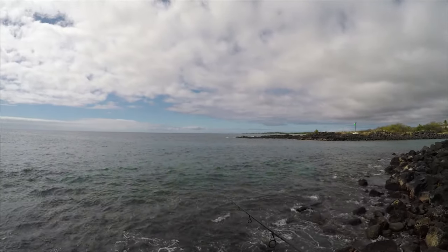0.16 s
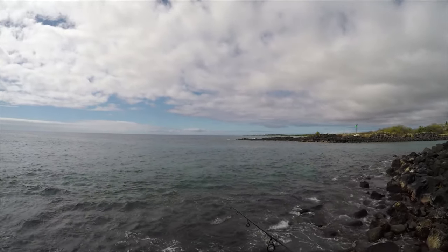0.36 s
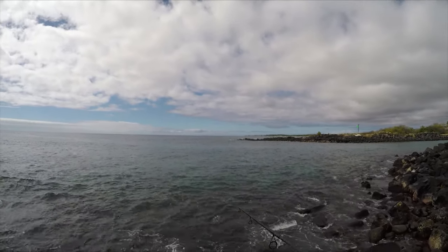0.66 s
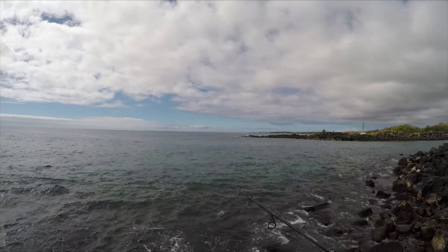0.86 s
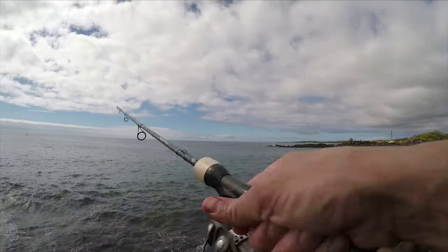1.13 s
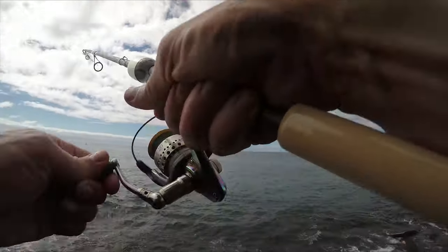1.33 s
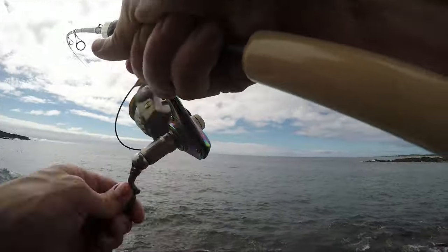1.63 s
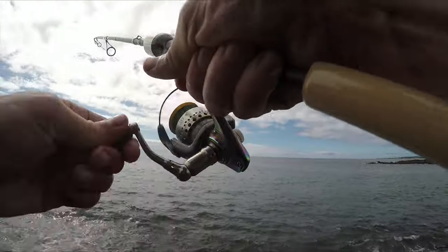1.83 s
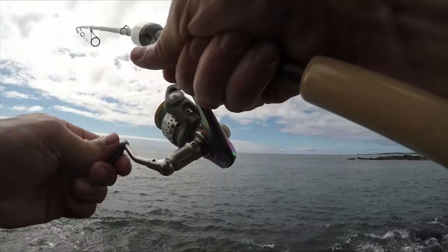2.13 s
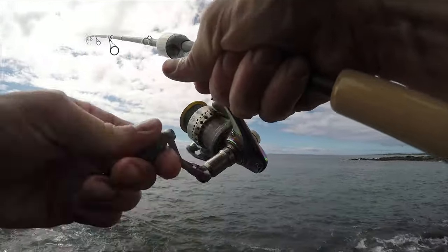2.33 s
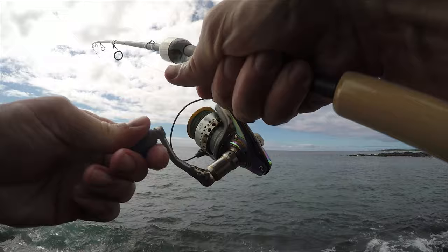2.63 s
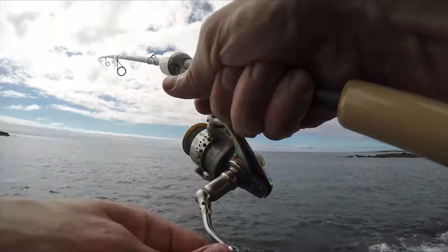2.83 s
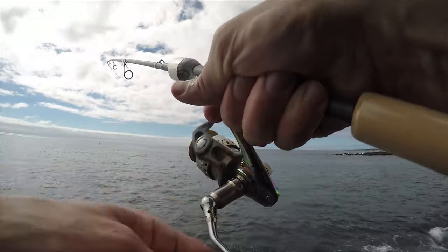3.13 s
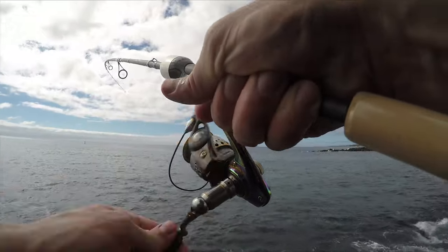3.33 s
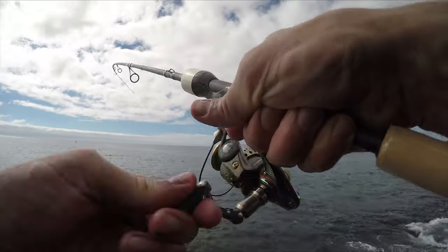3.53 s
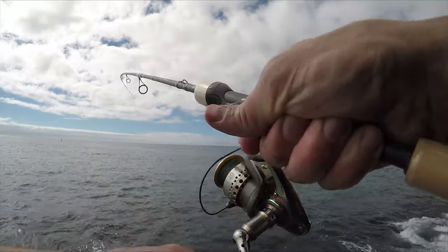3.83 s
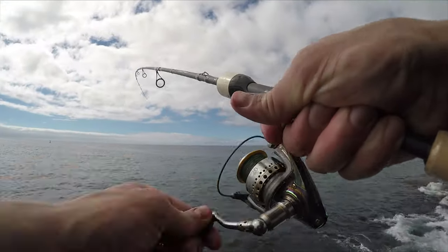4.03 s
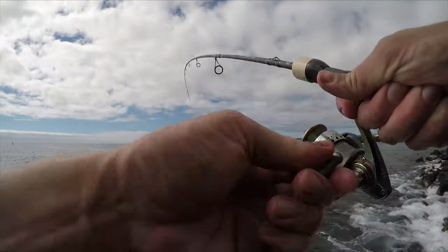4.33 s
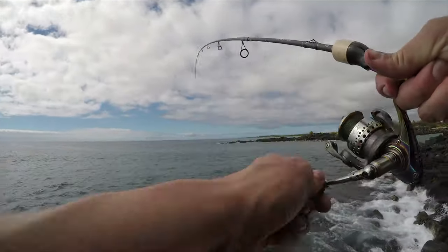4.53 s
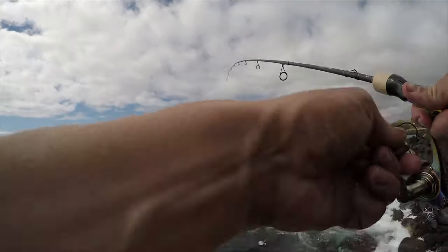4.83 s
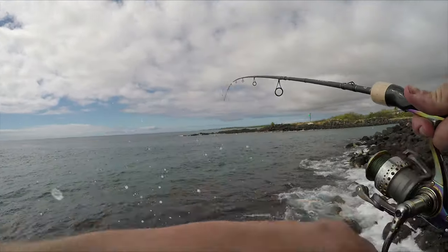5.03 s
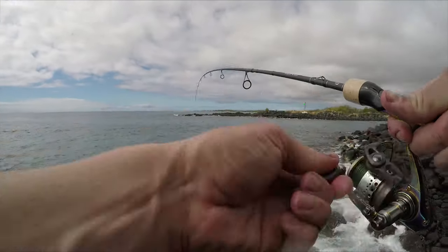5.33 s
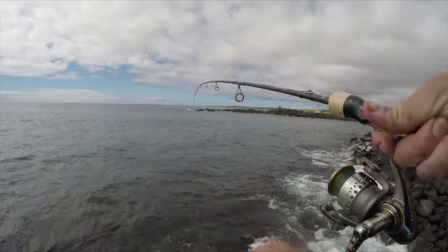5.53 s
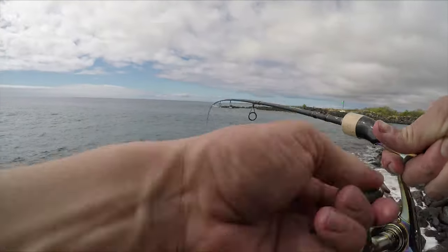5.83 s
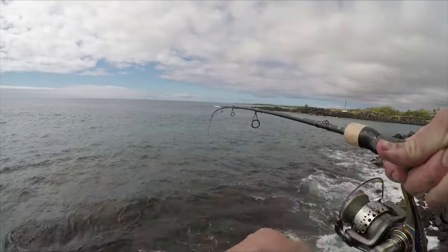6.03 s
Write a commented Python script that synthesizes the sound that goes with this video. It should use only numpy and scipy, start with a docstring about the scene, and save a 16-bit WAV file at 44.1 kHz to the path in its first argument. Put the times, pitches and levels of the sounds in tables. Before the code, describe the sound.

Muffled sea washes against a rocky shore while wind thumps on a microphone inside a closed plastic case. A fishing reel starts winding with a soft raspy whirr and a few short, high squeaks. A wave builds and breaks on the boulders with a hollow roar, then drains away in hissing foam. Near the end, drops and tackle tick sharply and a hand scrapes faintly on the rod.

```python
"""Angling on a rocky shore

A wave breaks on boulders and drains away: bubbles resonate, foam bursts and spray fizzes. An angler winds a
spinning reel, whose gears whirr and whose dry bearing squeaks by stick-slip friction. A hand scrapes on the
rod; drops and tackle tick. All is heard from inside a closed plastic case, which muffles the surf, rings at its
own resonances and is buffeted by the wind, the hand and the wave."""
import sys
import numpy as np
from scipy import signal
from scipy.fft import rfft, irfft
from scipy.io import wavfile
from scipy.ndimage import uniform_filter1d

SR = 44100
rng = np.random.default_rng(int(sys.argv[2]) if len(sys.argv) > 2 else 0)


def dump(signal):
    """Clip the signal to [-1, 1] and save it as 16-bit WAV at the path in sys.argv[1]."""
    limited = np.clip(np.atleast_2d(signal).T, -1, 1)
    pcm = np.round(limited * 32767).astype(np.int16)
    wavfile.write(sys.argv[1], SR, pcm)


N = 271643
TIME = np.arange(N) / SR


# the wave builds, breaks and drains: t/s, level/dB
SURGE = [(0, -33.5), (1.0, -28.5), (1.4, -26), (2.55, -24.5), (3.22, -19.5), (3.31, -16.3), (3.8, -15),
         (4.15, -16), (4.65, -18.5), (4.9, -17.5), (5.25, -21.5), (5.7, -21.6), (6.16, -26)]

def surf():
    """Air entrainment: the surge drives the roar, and feeds foam and spray that outlast it."""
    surge_db, = curves(SURGE)
    foaming = lingering(surge_db, linger_s=0.91, share=0.65, growth=1.46, crest_db=-29.5, rest_db=-44)
    spraying = lingering(surge_db, linger_s=.5, share=0.63, growth=1.63, crest_db=-40.5, rest_db=-58)
    return undb(surge_db) * roar() + np.hypot(foaming, splashes()) * foam() + spraying * spray()


def lingering(surge_db, linger_s, share, growth, crest_db, rest_db):
    """Exponential relaxation: gain of a hiss, with a share that lags the surge, over a steady floor."""
    power = undb(surge_db + 16) ** 2  # relative to a crest of -16 dB
    keep = np.exp(-1 / (linger_s * SR))
    stored = signal.lfilter([1 - keep], [1, -keep], power)
    amount = (1 - share) * power + share * stored
    return np.hypot(undb(crest_db) * amount ** (growth / 2), undb(rest_db))


# share of the power in tumbling rather than washing water: t/s, share (0-1)
TUMBLING = [(0, 0.47), (2.6, 0), (3.3, 0.86), (4.3, 1), (4.7, 0.22), (5.6, 0.14), (6.16, 0.47)]
# spectra of tumbling and of washing water inside the case: f/Hz, relative level/dB
CRASH_SPECTRUM = [(40, -24.5), (110, 1.5), (200, -5), (330, 0), (520, -0.5), (700, 1.5), (850, -4),
                  (1050, -12), (1300, -25), (1750, -27.5), (3500, -32.5), (4800, -27.5), (7000, -41),
                  (9000, -63)]
WASH_SPECTRUM = [(40, -16.5), (110, 2), (200, -4.5), (330, -2), (520, -1.5), (690, 0), (800, -4),
                 (950, -12), (1300, -23), (1700, -26.5), (2400, -37.5), (4000, -75)]

def roar():
    """Turbulence and large bubbles: a broad crash trades power with a hollow wash among the stones."""
    share, = curves(TUMBLING)
    gurgle = bubbles(low_hz=176.7, high_hz=1404, cycles=15.3, spread_db=6.5, count=3000)
    crash = colour(noise() + undb(-11) * pops(rate=500, spread_db=2), CRASH_SPECTRUM)
    wash = colour(noise() + undb(-13) * gurgle, WASH_SPECTRUM)
    return (np.sqrt(share) * crash + np.sqrt(1 - share) * wash) * undb(.5 * walk(18))


def bubbles(low_hz, high_hz, cycles, spread_db, count):
    """Bubble resonance: each is a damped oscillator whose pitch rises as it nears the surface."""
    out = np.zeros(N)
    for when, pitch, size in rng.random((count, 3)):
        hz = low_hz + (high_hz - low_hz) * pitch
        life = cycles / hz
        t = np.arange(int(life * SR) + 2) / SR
        chirp = ring(hz * (1 + 0.18 * t / life), life, t)
        add(out, when * N / SR, undb(spread_db * size) * np.sqrt(hz) * chirp)
    return unit(out)


# spectrum of foam inside the case: f/Hz, relative level/dB
FOAM_SPECTRUM = [(900, -24.5), (1750, -16), (2100, -8), (2500, 0.5), (2800, 1.5), (3150, -2.5), (3550, -12),
                 (4000, -9.5), (4800, -7.5), (5600, -10), (6300, -11), (7200, -17), (8000, -24),
                 (10000, -42)]

def foam():
    """Forced vibration: the crackle and hiss of bursting foam excite the walls of the case."""
    crackle = pops(rate=2500, spread_db=4.5)
    return colour(noise() + undb(-5) * crackle, FOAM_SPECTRUM) * undb(0.7 * walk(24.9))


# water slaps a boulder and bursts into foam: t/s, level/dB
SPLASHES = [(3.33, -32.5), (3.91, -33), (4.3, -32.5), (4.56, -30), (4.84, -31.5), (5.06, -36)]

def splashes():
    """Incoherent sources add in power: the gain of the foam that the splashes throw up."""
    gains = [undb(db) * swell(s, rise_s=0.065, hold_s=0, fall_s=0.18) for s, db in SPLASHES]
    return np.sqrt(sum(gain ** 2 for gain in gains))


# spectrum of spray inside the case: f/Hz, relative level/dB
SPRAY_SPECTRUM = [(5000, -2), (7200, -4), (8000, 5.5), (9000, 1), (10500, 1.5), (11700, -1), (13000, 3.5),
                  (14200, 1.5), (15500, -3.5)]

def spray():
    """Shot noise: the finest droplets merge into a high fizz; now and then a larger one lands."""
    fizz = pops(rate=2600, spread_db=5.5)
    drops = pops(rate=45, spread_db=5)
    patter = noise() + undb(-10) * fizz + undb(-15) * drops
    return colour(patter, SPRAY_SPECTRUM) * undb(.5 * walk(25.3))


# whirr of the reel as it is wound: t/s, level/dB
WINDING = [(0, -75), (1.0, -64), (1.25, -42), (1.4, -35), (1.53, -38.5), (1.7, -35.5), (2.05, -38.5),
           (2.15, -38.5), (2.23, -40), (2.38, -42.5), (4.5, -37.5), (6.16, -51)]
# spectrum of the whirr: f/Hz, relative level/dB
REEL_SPECTRUM = [(300, 4), (800, -3.5), (1300, 2), (1600, -18), (1850, -23), (2100, -1), (2400, 3),
                 (2900, -13.5), (3400, -21), (4200, -10.5), (6700, -21), (7900, -12), (11000, -37),
                 (13500, -28)]

def reel():
    """Amplitude modulation: the rasp of gears and running line throbs as the rotor goes round."""
    whirr_db, = curves(WINDING)
    rotor_hz = 11 * (1 + 0.1 * walk(2.3))
    throb_db = 0.85 * np.sin(2 * np.pi * np.cumsum(rotor_hz) / SR)
    rasp = noise() + undb(-2.5) * pops(rate=900, spread_db=4)
    return colour(rasp, REEL_SPECTRUM) * undb(whirr_db + throb_db + 1.5 * walk(90))


# squeaks of the reel: t/s, duration/s, f/Hz, level/dB
SQUEAKS = [(1.476, 0.018, 4150, -39), (1.621, .05, 2480, -29.5), (1.678, 0.059, 2485, -25.5),
           (2.224, 0.017, 2420, -33.5)]

def squeak(slip_s=.016, glide=0.023, warble_hz=25.34, warble_depth=0.062, warble_top_s=1.671):
    """Stick-slip friction: a dry bearing gives runs of short gliding tones with a weak octave."""
    out, roughness = np.zeros(N), walk(400)
    bend = warble_depth * np.cos(2 * np.pi * warble_hz * (TIME - warble_top_s)) + 0.025 * walk(500)
    for start, length, hz, db in SQUEAKS:
        slips = max(round(length / slip_s), 1)
        for s in start + length * np.arange(slips) / slips:
            n, i = int(length / slips * SR), int(s * SR)
            first_hz, last_hz = hz * (1 + glide * rng.standard_normal(2))
            pitch_hz = np.linspace(first_hz, last_hz, n) * (1 + bend[i:i + n])
            phase = 2 * np.pi * np.cumsum(pitch_hz) / SR
            envelope = signal.windows.tukey(n, .4) * undb(db + 1.6 * roughness[i:i + n])
            add(out, s, envelope * (np.sin(phase) + undb(-18) * np.sin(2 * phase)))
    return out


# drops and tackle strike the case and rod: t/s, peak level/dB, f/Hz
TICKS = [(.385, -32, 4600), (1.019, -29, 4700), (1.2483, -22, 4700), (1.311, -30, 10500),
         (2.6098, -28, 5200), (4.1475, -30, 5000), (5.1027, -20.5, 5340), (5.238, -26, 11500),
         (5.62, -20, 4500), (5.6695, -17, 5000), (5.720, -23, 6000), (5.736, -19, 4180),
         (5.7705, -21.5, 5730), (5.803, -26, 9500)]
# normal modes of the case: f/Hz, T60/s, relative level/dB
CASE_MODES = [(2600, .010, -12), (4700, 0.0064, 2), (6200, .006, -26), (13000, .004, -16)]

def ticks():
    """Impact excitation: each tick cracks around its own pitch and sets the modes of the case ringing."""
    out, t = np.zeros(N), np.arange(SR // 40) / SR
    case = sum(undb(db) * ring(hz, t60, t) for hz, t60, db in CASE_MODES)
    attack, decay = 1 - np.exp(-t / 0.00012), np.exp(-t / 0.0011)
    for s, db, hz in TICKS + stray_drops(count=7):
        band = signal.butter(2, [.6 * hz, 1.4 * hz], "bandpass", fs=SR, output="sos")
        crack = signal.sosfilt(band, rng.standard_normal(len(t)) * decay)
        tick = (crack + undb(-4) * ring(hz, 0.005, t) + undb(-6) * case) * attack
        add(out, s, undb(db) * tick / np.abs(tick).max())
    return out


def stray_drops(count, from_s=3.6, until_s=6.0, db=-21, scatter_db=1, hz=4730, scatter_octaves=0.23):
    """Random arrivals: drops land after the wave breaks, as rows of t/s, peak level/dB, f/Hz."""
    return [(from_s + when * (until_s - from_s),
             db + scatter_db * (2 * size - 1),
             hz * 2 ** (scatter_octaves * (2 * pitch - 1)))
            for when, size, pitch in rng.random((count, 3))]


# the hand works on the rod handle: t/s, hold/s, level/dB
GRIPS = [(1.0, .48, -44.5), (4.5, 1.45, -44)]
# spectrum of the scrape: f/Hz, relative level/dB
GRIP_SPECTRUM = [(1700, -23), (2500, 7.5), (3400, -0.5), (4600, -0.5), (6300, -6), (7500, -28),
                 (12000, -34)]

def grip():
    """Sliding friction: skin scrapes unevenly over the rod handle in tiny catches."""
    scrape = colour(noise() + undb(-3) * pops(rate=530, spread_db=5), GRIP_SPECTRUM)
    effort = sum(undb(db) * swell(s, rise_s=.02, hold_s=hold, fall_s=.07) for s, hold, db in GRIPS)
    return scrape * effort * undb(2 * walk(30.6))


# the breeze on the case, which drops once the wave has broken: t/s, level/dB
BREEZE = [(0, -18), (0.7, -16), (1.7, -17.5), (2.22, -21.5), (2.5, -18), (3.2, -18), (4.2, -18),
          (4.62, -14.5), (4.76, -25), (5.05, -27), (6.16, -25)]
# buffets on the case: gusts of wind, bumps of the hand (1.345, 2.466 s) and thuds of the plunging wave (4.296,
# 4.867 s): t/s of the peak, 1/e half-width/s, rumble level/dB, flutter level/dB
BUFFETS = [(0.245, 0.048, -13.5, -49), (0.474, 0.043, -11.5, -34), (0.668, .04, -21, -45),
           (0.962, 0.028, -17, -34), (1.345, 0.033, -15.5, -23.5), (2.068, .025, -10.5, -32),
           (2.466, .05, -13.5, -24.5), (2.808, 0.015, -9.5, -37), (3.015, 0.037, -12.5, -32),
           (3.503, 0.014, -7.5, -36), (3.77, 0.038, -18, -38), (3.878, 0.036, -17, -24),
           (4.082, .035, -11, -26), (4.296, 0.28, -22, -21.5), (4.44, .025, -21, -27), (4.867, .12, -20, -23),
           (6.15, 0.019, -14, -36)]
# spectra of the large and of the small eddies: f/Hz, relative level/dB
RUMBLE_SPECTRUM = [(8, -24), (20, -3.5), (35, 0), (55, -4), (85, -8.5), (120, -17.5), (180, -22),
                   (300, -36), (800, -74)]
FLUTTER_SPECTRUM = [(40, 1), (130, -2), (330, -2.5), (550, -7), (1000, -23), (3000, -56)]

def wind():
    """Turbulent pressure: large eddies rumble on the case; gusts, bumps of the hand and thuds of the wave
    buffet it, with a flutter on top."""
    breeze_db, = curves(BREEZE)
    power, flutter = undb(breeze_db + 1.6 * walk(18)) ** 2, 0
    for s, half_width, rumble_db, flutter_db in BUFFETS:
        gust = np.exp(-((TIME - s) / half_width) ** 2)
        power = power + (undb(rumble_db) * gust) ** 2
        flutter = flutter + undb(flutter_db) * gust
    eddies = colour(noise(), RUMBLE_SPECTRUM)
    running_rms = np.sqrt(uniform_filter1d(eddies ** 2, size=4000))
    return eddies / running_rms * np.sqrt(power) + flutter * colour(noise(), FLUTTER_SPECTRUM)


# spectrum of distant waves inside the case: f/Hz, relative level/dB
OPEN_SEA_SPECTRUM = [(100, -10.5), (500, 3.5), (900, -6), (1150, -9), (1450, -17.5), (1750, -26),
                     (2500, -13), (3100, -16.5), (3600, -26), (7000, -54)]

def open_sea():
    """Incoherent superposition: small waves further along the shore merge into an even rush."""
    return colour(noise(), OPEN_SEA_SPECTRUM) * undb(-34.5 + 0.42 * walk(3.4))


def undb(db):
    """Level in decibels to amplitude ratio."""
    return 10 ** (np.asarray(db) / 20)


def unit(x):
    """Normalisation to rms 1."""
    return x / np.sqrt(np.mean(x ** 2))


def curves(table):
    """Linear interpolation of a timed table's columns, one value per sample."""
    s, *columns = np.transpose(table)
    return [np.interp(TIME, s, c) for c in columns]


def swell(s, rise_s, hold_s, fall_s):
    """Exponential growth and decay: an envelope that reaches 1 at time s and holds before it falls."""
    return np.exp(-np.maximum(s - TIME, 0) / rise_s - np.maximum(TIME - s - hold_s, 0) / fall_s)


def noise():
    """Gaussian white noise of rms 1."""
    return rng.standard_normal(N)


def walk(rate):
    """Smooth random modulation: values held for 1 / rate seconds and averaged twice; rms 1."""
    k = max(int(SR / rate), 2)
    held = np.repeat(rng.standard_normal(N)[:N // k + 1], k)
    return unit(uniform_filter1d(uniform_filter1d(held, k), k)[:N])


def pops(rate, spread_db):
    """Poisson process: on average rate impulses a second, many small and a few large; rms 1."""
    happens = rng.random(N) < rate / SR
    size = undb(spread_db * np.minimum(rng.exponential(size=N), 5))
    return unit(happens * size * rng.choice([-1, 1], N))


def colour(x, spectrum, size=16384):
    """Minimum-phase filtering by a spectrum of f/Hz, relative level/dB; output rms 1."""
    hz, db = np.transpose(spectrum)
    bins = np.maximum(np.arange(size // 2 + 1) * SR / size, 1)
    gain = undb(np.interp(np.log(bins), np.log(hz), db))
    cepstrum = irfft(np.log(gain))
    cepstrum[1:size // 2] *= 2  # folding onto positive time makes the filter causal
    cepstrum[size // 2 + 1:] = 0
    response = irfft(np.exp(rfft(cepstrum)))
    return unit(signal.fftconvolve(x, response)[:N])


def ring(hz, t60, t):
    """Damped oscillation of one mode, falling 60 dB in t60 seconds."""
    return np.sin(2 * np.pi * hz * t) * np.exp(-np.log(1000) * t / t60)


def add(out, s, sound):
    """Superpose a short sound at time s."""
    i = max(int(s * SR), 0)
    out[i:i + len(sound)] += sound[:max(N - i, 0)]


def scene():
    """Linear superposition: sea, wind and the angler's tackle sum in one channel."""
    return (surf() + open_sea() + wind() + reel() + ticks() + squeak() + grip())[None]


def record(dry, cutoff_hz=15150):
    """Band limiting: a steep low-pass filter removes the highest treble."""
    return signal.sosfilt(signal.ellip(10, .2, 80, cutoff_hz, fs=SR, output="sos"), dry)


dry = scene()
out = record(dry)
dump(out)
```